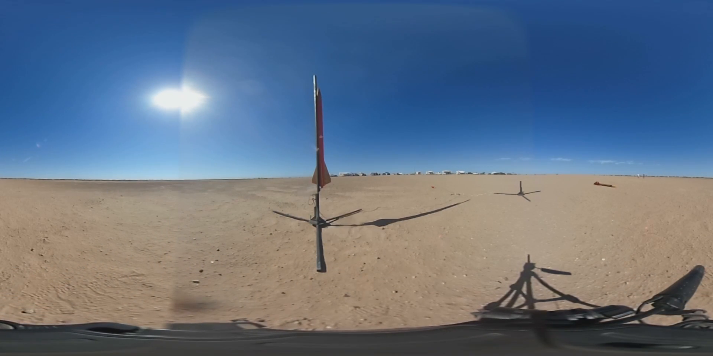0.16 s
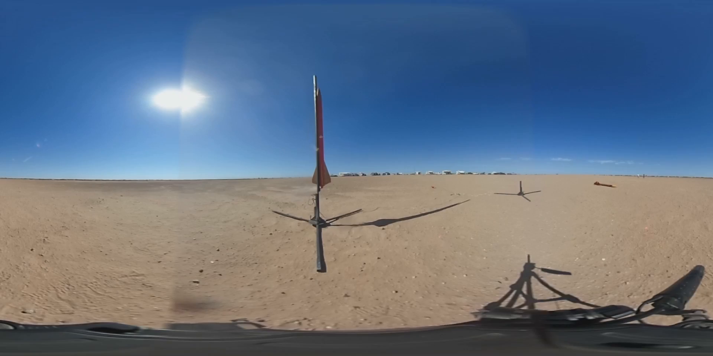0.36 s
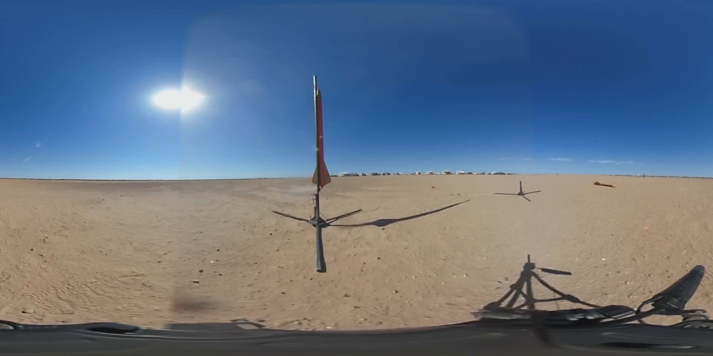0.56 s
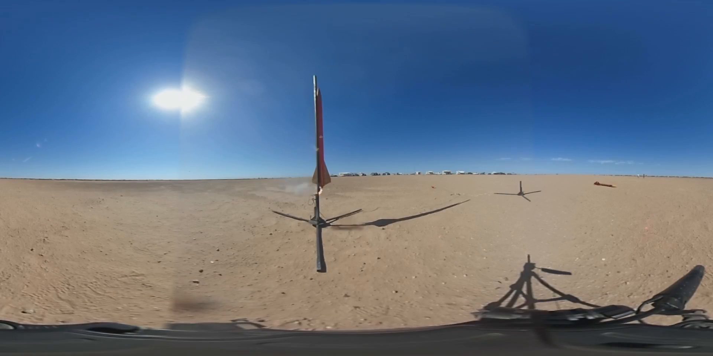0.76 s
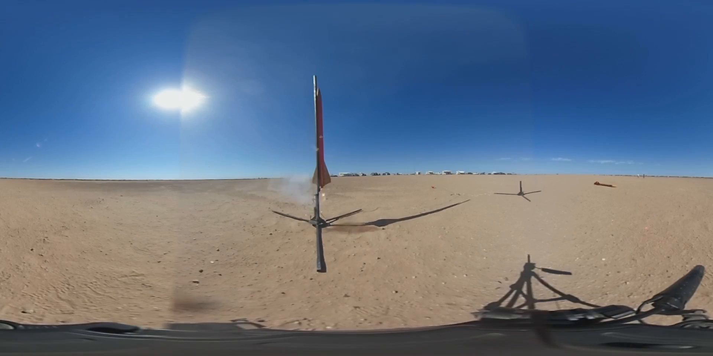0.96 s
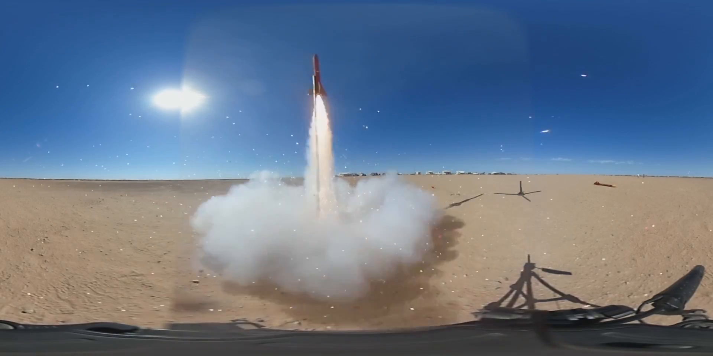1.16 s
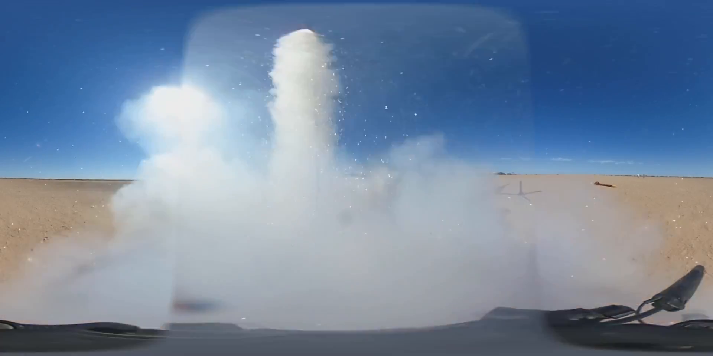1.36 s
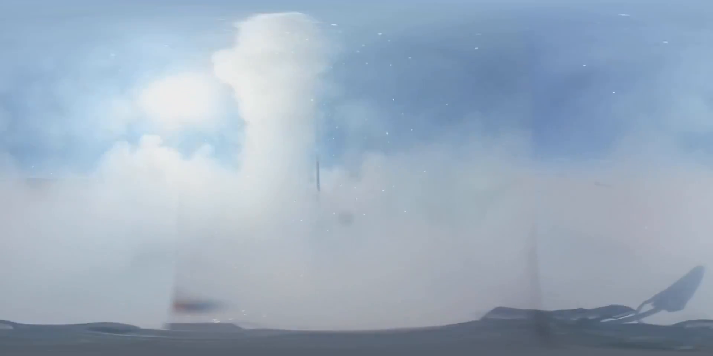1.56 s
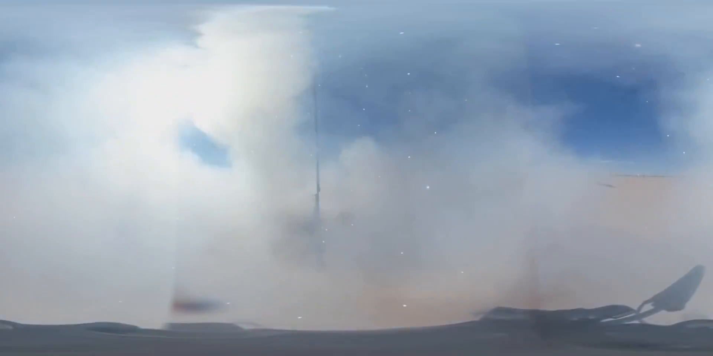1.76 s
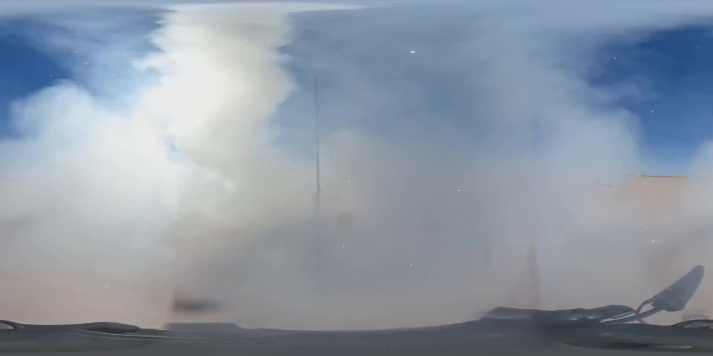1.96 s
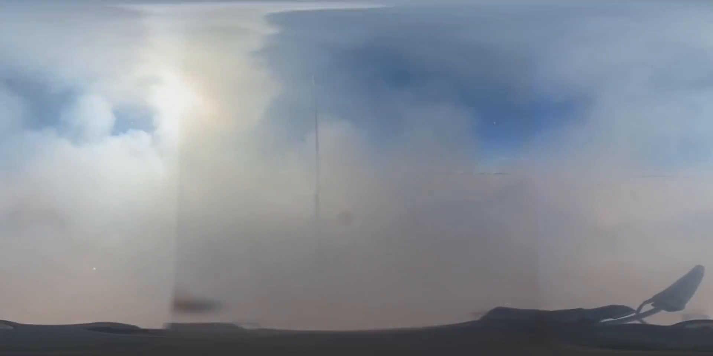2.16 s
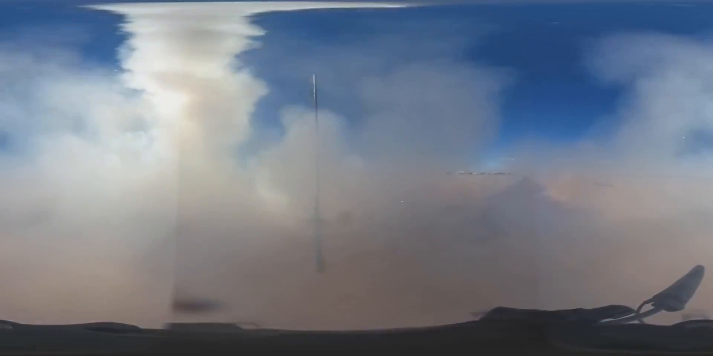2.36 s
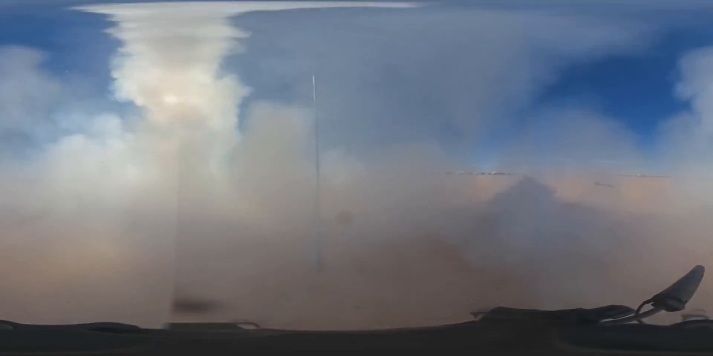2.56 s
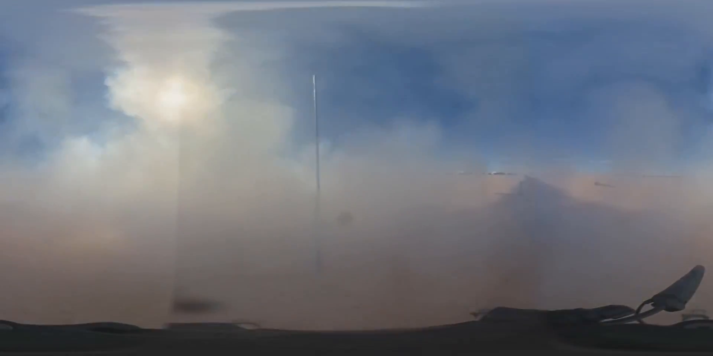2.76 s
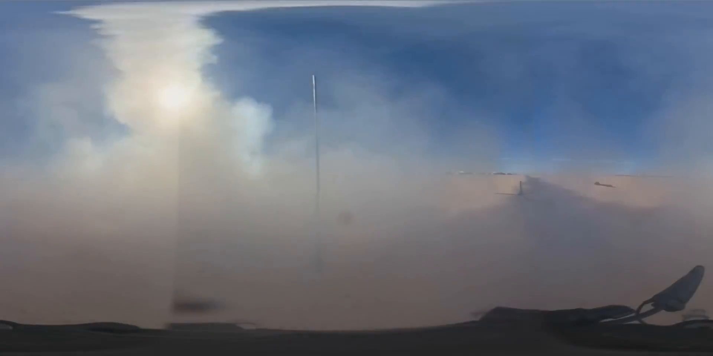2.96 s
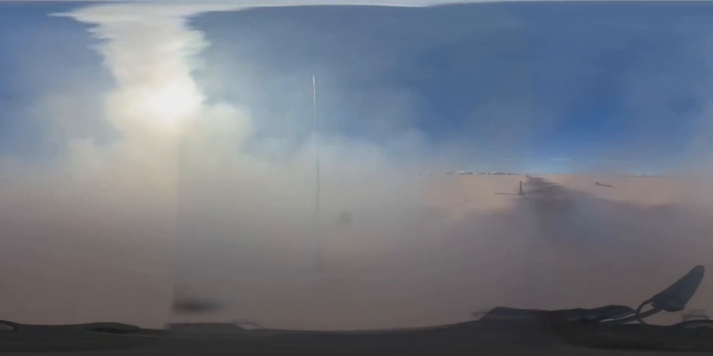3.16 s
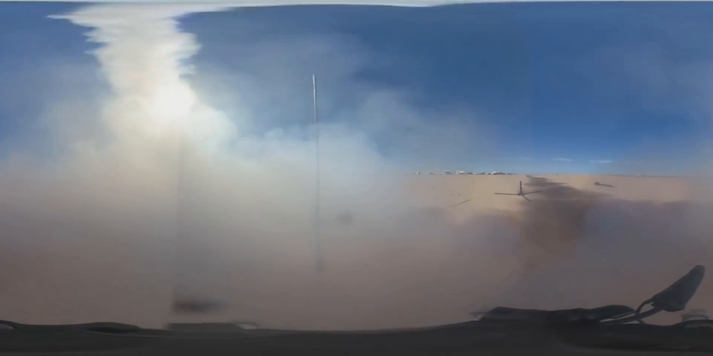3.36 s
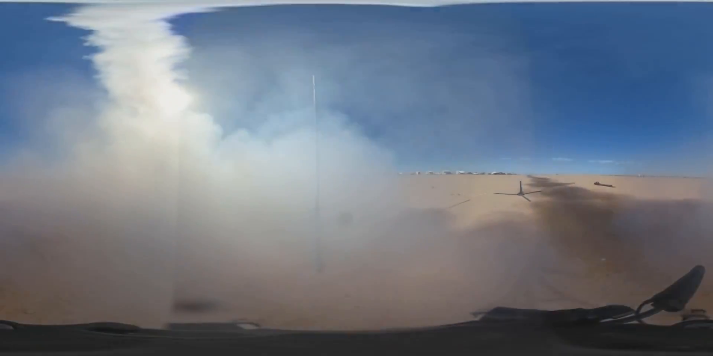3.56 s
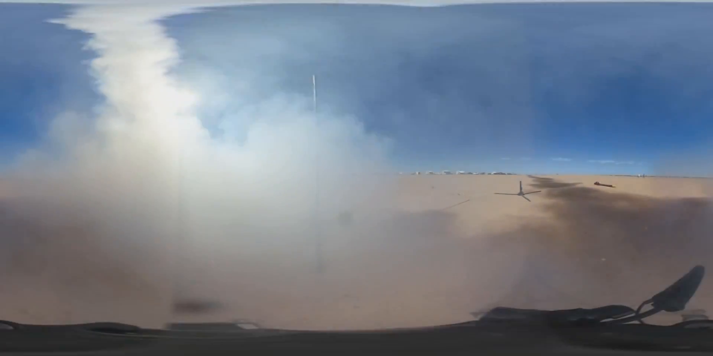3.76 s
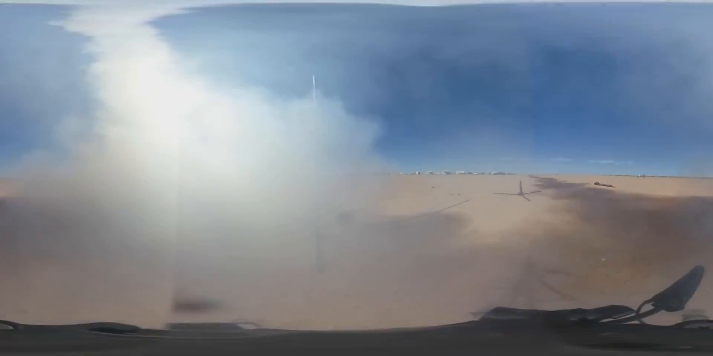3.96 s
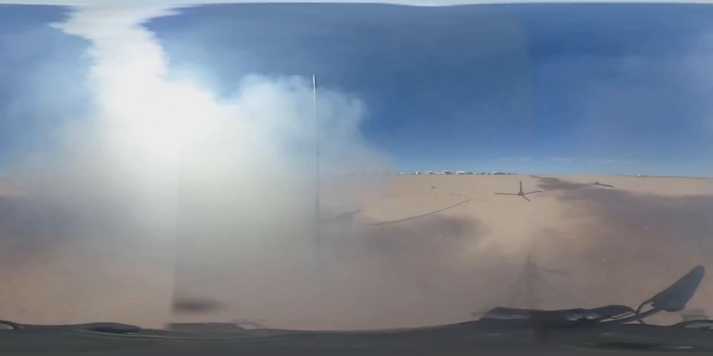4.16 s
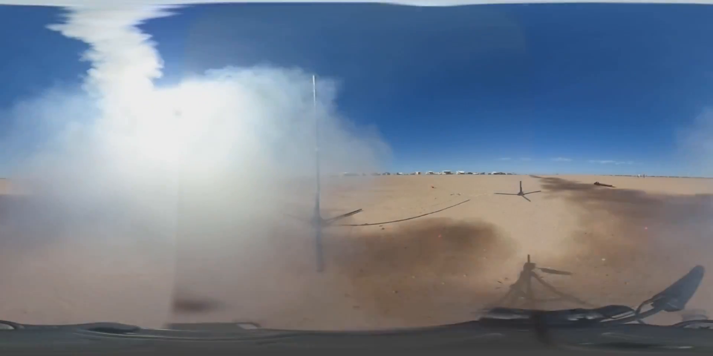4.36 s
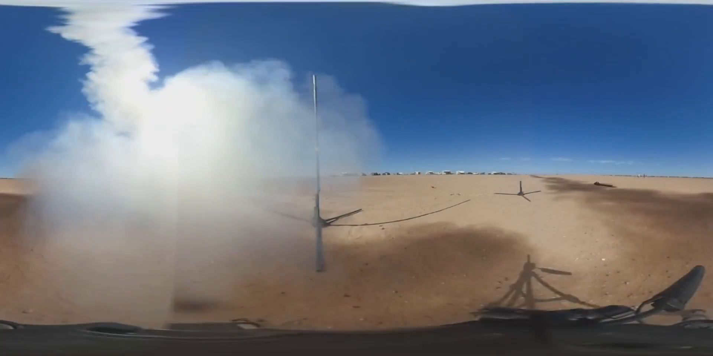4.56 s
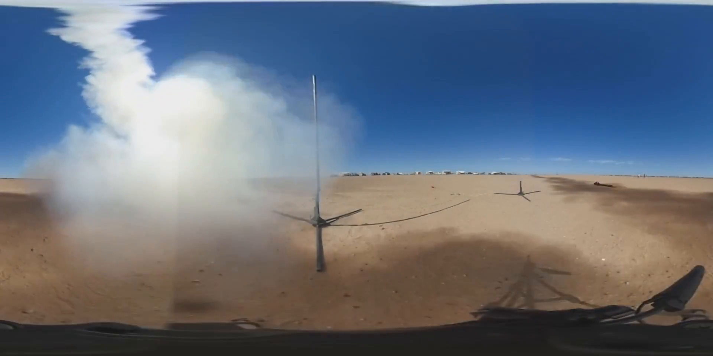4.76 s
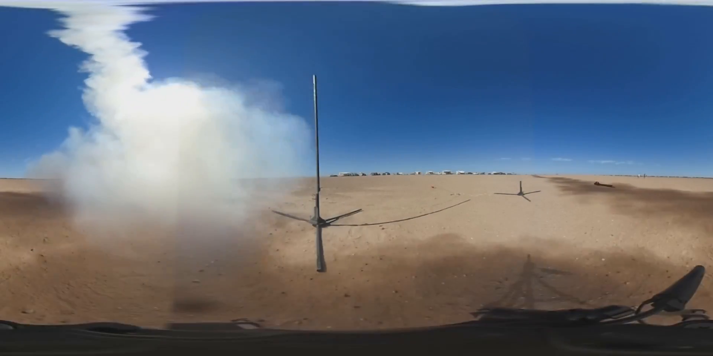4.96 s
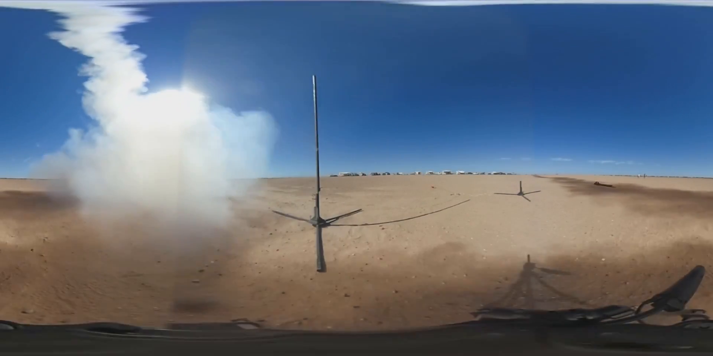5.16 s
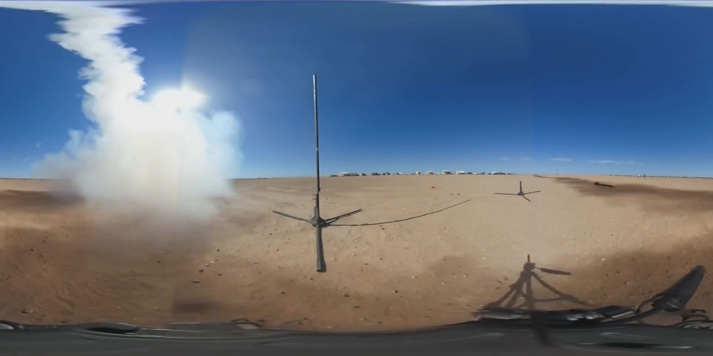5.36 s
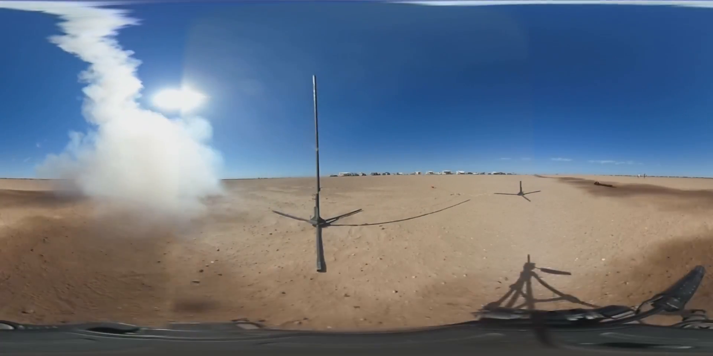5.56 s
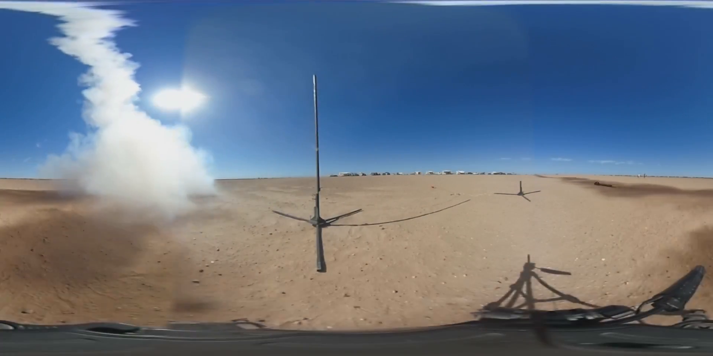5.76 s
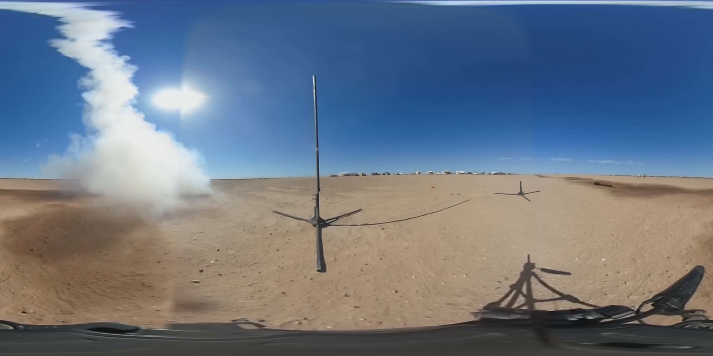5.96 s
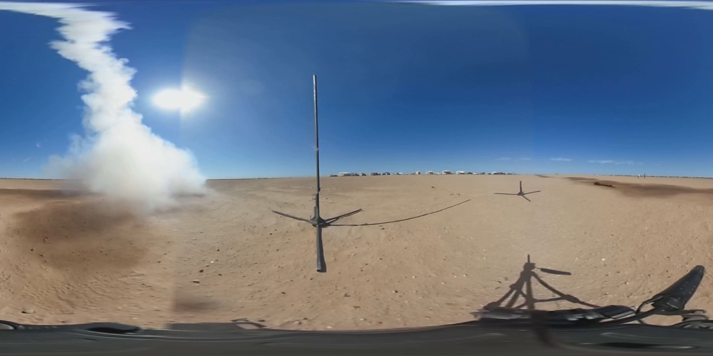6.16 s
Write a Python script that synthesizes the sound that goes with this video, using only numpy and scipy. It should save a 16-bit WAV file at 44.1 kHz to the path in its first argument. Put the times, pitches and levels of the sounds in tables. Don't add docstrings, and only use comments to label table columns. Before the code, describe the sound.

Open desert, small microphone a few metres from the pad. A very faint igniter hiss with a thin whistle, then a chuff, crackling pops and an abrupt harsh roar that overloads the microphone. It turns duller and bassier as the rocket climbs, with heavy low thuds, then fades. Grit ticks on the housing and the smoke cloud buffets the microphone before near silence returns.

```python
import sys
import numpy as np
from scipy import signal
from scipy.fft import rfft, irfft
from scipy.io import wavfile
from scipy.ndimage import uniform_filter1d

SR = 44100
rng = np.random.default_rng(int(sys.argv[2]) if len(sys.argv) > 2 else 0)


def volts_from_decibels(level):
    exponent = np.asarray(level, float) / 20
    return 10 ** exponent


def inscribe(sig):
    pcm = np.round(np.clip(np.atleast_2d(sig).T, -1, 1) * 32767)
    wavfile.write(sys.argv[1], SR, pcm.astype(np.int16))


N = 274478
T = np.arange(N) / SR
HZ = np.fft.rfftfreq(N, 1 / SR)


def curve(table):
    s, *columns = np.transpose(table)
    return [np.interp(T, s, column) for column in columns]


def noise(colour, shape=1):
    hz, db = np.transpose(colour)
    gain = volts_from_decibels(np.interp(np.log(HZ + 1), np.log(hz), db))
    x = irfft(rfft(rng.standard_normal(N)) * gain * shape, N)
    return x / np.std(x)


def walk(rate):
    k = int(SR / rate)
    steps = np.repeat(rng.standard_normal(N // k + 1), k)
    return 1.1 * uniform_filter1d(uniform_filter1d(steps, k), k)[:N]


def add(out, s, x):
    i = int(s * SR)
    out[i:i + len(x)] += x[:N - i]


def bump(s, width_s, db):
    return db * np.exp(-((T - s) / width_s) ** 2)


def peaks(base_db, rows, rise_db_s, fall_db_s):
    for s, db in rows:
        slope_db = np.where(T < s, rise_db_s * (s - T), fall_db_s * (T - s))
        base_db = np.maximum(base_db, db - slope_db)
    return base_db


def sand(x, lag_ms, share, size):
    late = np.interp(np.arange(N) - lag_ms * SR / 1000, np.arange(N), x)
    return (x + share * uniform_filter1d(late, size=size)) / np.sqrt(1 + share ** 2)


# (frequency [Hz], level [dB per Hz])
STILL_COLOUR = [(100, -1), (200, -2), (330, -5.5), (570, -7), (900, -10.5), (1300, -18), (2000, -21.5),
                (2800, -23.5), (6000, -26.5), (12000, -29)]
# (frequency [Hz], level [dB])
WHINES = [
    (1394, -84),
    (1857, -90.5),
]
WHINE_END_S = 5.992


def still():
    clock = T + 4.5 * np.clip(T - WHINE_END_S + .014, 0, None) ** 2
    whine = sum(np.sqrt(2) * volts_from_decibels(db) * np.sin(2 * np.pi * hz * clock) for hz, db in WHINES)
    fade_db = np.interp(T, [.6, 4.3, 5.8, 6.05], [-0.5, 0.5, 0, -4.0])
    colour = rfft(noise(STILL_COLOUR, HZ > 120))
    edges_hz = (0, 280, 450, 750, 1200)
    air = np.zeros(N)
    for lo, hi in zip(edges_hz, edges_hz[1:]):
        air += irfft(colour * (HZ >= lo) * (HZ < hi), N) * volts_from_decibels(2.2 * walk(12))
    hiss = irfft(colour * (HZ >= edges_hz[-1]), N)
    return (air * volts_from_decibels(fade_db) + hiss) * volts_from_decibels(-73) + whine * (T < WHINE_END_S)


# (time [s], level [dB])
WIND_LEVEL = [(0, -72.5), (.69, -74.5), (.72, -53), (.85, -65), (.96, -45), (1.034, -34), (1.17, -39.5),
              (1.3, -32), (1.8, -34), (2.0, -55.5), (2.66, -56), (4.36, -55.5), (4.65, -70.5),
              (6.22, -72.5)]
# (time [s], peak level [dB])
GUST_PEAKS = [
    (2.98, -46.5),
    (3.49, -51),
    (3.89, -47),
    (4.11, -47),
    (4.68, -65.5),
    (5.21, -67.5),
    (5.6, -67.5),
    (6.08, -67),
]
# (time [s], peak level [dB])
BUFFET_HITS = [(2.929, -24.5), (3.301, -35), (3.43, -36), (3.5, -41), (3.599, -43.5), (3.654, -45),
               (3.735, -37), (3.778, -47), (3.841, -34), (3.879, -41.5), (3.929, -38.5), (3.981, -44),
               (4.029, -38.5), (4.092, -31.5), (4.16, -38.5), (4.239, -56), (4.306, -54), (4.356, -54),
               (4.42, -51), (4.491, -56.5), (4.669, -59.5)]
BUFFET_DECAY_S = 0.1


def wind():
    level_db = peaks(curve(WIND_LEVEL)[0], GUST_PEAKS, rise_db_s=55.5, fall_db_s=64)
    eddies = walk(6.7)
    deep = noise([(14, -30), (30, -2), (60, -1), (100, -5.0), (150, -26.0), (400, -80)])
    deep *= volts_from_decibels(1.0 * eddies - 0.5)
    flutter = noise([(30, -33.5), (80, 0), (160, -1.5), (300, -21), (600, -35.5), (1500, -71.0)])
    flutter_db = -13.5 + 5.5 * np.clip(eddies, -1.5, 1.5)
    blow, slaps, t = np.zeros(N), np.zeros(N), T[:SR // 2]
    blow_shape = np.exp(-t * 3.25 / BUFFET_DECAY_S) * np.clip(t / 0.0035, 0, 1)
    slap = np.sin(2 * np.pi * 105 * t) + 0.33 * np.sin(2 * np.pi * 270 * t)
    slap *= np.exp(-t / 0.012) * np.clip(t / 0.0049, 0, 1)
    for s, db in BUFFET_HITS:
        add(blow, s, volts_from_decibels(db - 10.5) * blow_shape)
        add(slaps, s, volts_from_decibels(db - 4.0) * slap)
    blow *= volts_from_decibels(1.6 * walk(51))
    return volts_from_decibels(level_db) * (deep + volts_from_decibels(flutter_db) * flutter) + blow * flutter + slaps


# (time [s], level [dB])
FIZZ_LEVEL = [
    (0, -78.5),
    (.3, -75.5),
    (.6, -73.5),
    (.7, -63),
    (1.2, -69),
    (3.2, -77),
    (3.7, -84.5),
    (4.2, -87.5),
    (6.3, -112),
]
# (frequency [Hz], level [dB per Hz])
GAS_COLOUR = [(180, -43.5), (300, -13.5), (1400, 1), (1610, -8.5), (2300, -3.5), (3180, -22), (6470, -21),
              (7790, -12), (8950, -14), (12000, -8.5), (15600, -41), (22000, -120)]
IGNITER_OUT_S = 1.1


def fizz():
    level_db, = curve(FIZZ_LEVEL)
    whistle_db = -14.5 + bump(0.54, width_s=0.16, db=8.8)
    whistle_db -= 26 * np.clip((T - IGNITER_OUT_S) / .2 + .5, 0, 1)
    whistle = noise([(7300, -27), (7930, -0.5), (8500, -31.5)])
    spit = noise(GAS_COLOUR) + volts_from_decibels(whistle_db) * whistle
    return sand(spit, lag_ms=1.37, share=0.48, size=2) * volts_from_decibels(level_db + 1.5 * walk(11))


# (time [s], level [dB], sharpness of the flame [dB])
ON_PAD = [
    (.7, -45, -34),
    (.712, -53, -28),
    (.728, -48, -26),
    (.914, -33.5, -19.5),
    (.982, -31, -14.5),
    (1.0, -23, -24),
    (1.016, -25, -28),
]
# (time [s], level [dB], sharpness [dB])
CLIMBING = [
    (1.032, -24, 8),
    (1.1, -18, 3),
    (1.26, -16.5, 0),
    (1.376, -7.5, -9.5),
    (1.634, -15.5, -24.5),
    (1.86, -22.5, -23),
    (2.15, -31.5, -27.5),
    (2.56, -33.5, -31),
    (2.9, -42, -30),
]
# (time [s], level [dB], sharpness [dB])
BURNING_OUT = [
    (3.12, -45, -28),
    (3.28, -56.5, -22.5),
    (3.62, -71, -9.5),
    (4.0, -80, -2),
    (4.5, -78.5, -15),
]
# (frequency [Hz], level [dB per Hz])
PLUME_COLOUR = [(20, -35), (50, -18.5), (130, -2), (270, 3.5), (500, -4), (1000, -8.5), (2000, -16),
                (2700, -19.5), (3300, -30), (4300, -34), (6000, -40), (8500, -43), (12000, -45.5)]
# (frequency [Hz], width [Hz], gain [dB])
PORT_RINGS = [(7850, 870, 4.5), (11800, 2700, 10)]


def jet():
    level_db, sharp_db = curve(ON_PAD + CLIMBING + BURNING_OUT)
    level_db += bump(1.77, width_s=.02, db=-3)
    shadow_db = bump(1.155, width_s=0.046, db=-16)
    roar_db, hiss_db = level_db + shadow_db, level_db + sharp_db
    rumble_db = roar_db - 2.5 + np.interp(T, (1.4, 1.45), [-3.5, 0])
    rumble_db += bump(1.67, width_s=0.063, db=8)
    rumble_db -= 2 * np.clip(T - 2, 0, None)
    rush_db = level_db - 9 + 0.45 * np.clip(sharp_db + 19, 0, None) + 0.56 * shadow_db
    rush_db += -5.5 * (T < CLIMBING[0][0])
    rush_db += bump(3.58, width_s=.12, db=5)
    low, mid, high = (1 / (1 + (HZ / hz) ** 6) for hz in (330, 1100, 4200))
    port = volts_from_decibels(sum(db / (1 + (2 * (HZ - hz) / width) ** 2) for hz, width, db in PORT_RINGS))
    lumps, crackle = walk(25), walk(150)
    rumble = noise(PLUME_COLOUR, low) * volts_from_decibels(rumble_db + 1.0 + 1.6 * lumps)
    roar = noise(PLUME_COLOUR, mid - low) * volts_from_decibels(roar_db + 1.5 * lumps + 1.29 * crackle)
    rush = noise(PLUME_COLOUR, high - mid) * volts_from_decibels(rush_db + 0.24 * lumps + 1.4 * crackle)
    hiss = noise(PLUME_COLOUR, (1 - high) * port) * volts_from_decibels(hiss_db + 1.2 * walk(14) + 1.5 * walk(90))
    burning = np.clip((T - .694) / 0.005, 0, 1) * np.clip((4.7 - T) / 0.39, 0, 1)
    return (rumble + roar + rush + hiss) * burning


# (time [s], peak level [dB], length [ms])
SURGES = [(0.695, -36, 8.5), (0.742, -37, 2), (.869, -21.5, 1.94), (.92, -18.5, 2.8), (0.935, -22, 1.07),
          (0.987, -22, 2.2), (1.005, -16.5, 1.05), (1.017, -18.5, 7.3), (1.862, -57, 5.2), (1.884, -7.5, 3),
          (1.908, 5.5, 5.5), (1.945, -15, 4.9), (1.981, -15, 3.8), (2.042, -10.5, 6.4), (2.056, -7, 3.5),
          (2.092, -7.5, 5.1), (2.13, -17, 2.85), (2.159, -18.5, 5.2), (2.174, -13.5, 4), (2.242, -2, 5.93),
          (2.275, -12.5, 3.7), (2.328, -15, 2.84), (2.45, -15.5, 4.15), (2.568, -17, 9.6),
          (2.575, -13.5, 2.85)]


def thuds():
    out = np.zeros(N)
    for s, db, ms in SURGES:
        length = ms * SR / 1000
        u = np.arange(int(1.3 * length)) / length
        add(out, s, volts_from_decibels(db) * np.sin(2 * np.pi * u) * np.hanning(len(u)) ** 0.35)
    return uniform_filter1d(uniform_filter1d(out, size=4), size=6)


LIFT_S, LIFT_M_S2, LEAN_MS_PER_S = 1.01, 64, 0.14
NOZZLE_M, PAD_M, CAMERA_M = 1.07, 3.0, .73


def bounce():
    flight = np.clip(T - LIFT_S, 0, None)
    height = NOZZLE_M + .5 * LIFT_M_S2 * flight ** 2
    extra_m = np.hypot(PAD_M, height + CAMERA_M) - np.hypot(PAD_M, height - CAMERA_M)
    share = np.interp(T, (0.969, 1.029, 1.2, 1.31), [.85, 0.061, 0.061, .72])
    return extra_m / .343 + LEAN_MS_PER_S * flight, share


# (time [s], peak level [dB], level of the lower ring [dB])
GRAINS = [(1.9463, -51, -19), (1.9872, -39, -9), (2.0174, -38, -21), (2.0596, -38, -6), (2.1209, -39, -14),
          (2.246, -43, -16), (2.2741, -58, -9), (2.3055, -44, -20), (2.4677, -48, -12), (2.581, -53, -18),
          (2.6123, -52, -15), (2.63, -41.5, -24), (2.7161, -60, -25), (2.731, -55, -21), (2.787, -48, -23),
          (2.873, -61, -15), (2.9063, -54.5, -3), (2.9437, -57, -23), (3.0313, -48, -15.5),
          (3.7463, -55, -19), (3.9094, -54, -20)]
# (time [s], peak level [dB])
DUST_PUFFS = [(1.9, -66), (2.03, -59), (2.07, -56), (2.3, -73), (2.47, -75), (2.63, -66), (2.82, -72),
              (3.04, -59.5), (3.459, -77.5), (3.55, -76), (3.76, -77.5), (3.87, -71), (3.92, -76)]
GRIT_DECAY_S = .0016


def grit():
    out, t = np.zeros(N), T[:1500]
    upper = noise([(3500, -27), (6000, -17.5), (10000, -23.5), (11600, 6.5), (12000, -12.5)])
    lower = noise([(6500, -12), (8100, -11), (9700, -31)])
    for s, db, low_db in GRAINS:
        i = int(s * SR)
        spray = upper[i:i + len(t)] + volts_from_decibels(low_db + 12.0) * lower[i:i + len(t)]
        add(out, s, volts_from_decibels(db - 7) * spray * np.exp(-t / GRIT_DECAY_S))
    blowing = np.clip((T - 1.8) / .1, 0, 1) * np.clip((4.4 - T) / .1, 0, 1)
    sinking_db = -70 - 12 * (T - 2)
    dust_db = peaks(sinking_db, DUST_PUFFS, rise_db_s=344, fall_db_s=200)
    return out + upper[::-1] * volts_from_decibels(dust_db - 6.5 + 2.7 * walk(160)) * blowing


def scene():
    rocket = sand(jet() + thuds(), *bounce(), size=6)
    return (still() + wind() + fizz() + rocket + grit())[None]


def band_limit(x):
    return signal.sosfilt(signal.butter(12, 15710, fs=SR, output="sos"), x)


CEILING = .2
EDGE_HZ, TOP_HZ = 12000, 16300


def record(dry):
    below = np.clip((EDGE_HZ - HZ) / 60, 0, 1)
    above = (1 - below) * np.clip((TOP_HZ - HZ) / 3500, 0, 1) ** 1.1
    heard = irfft(rfft(dry) * below, N)
    clipped = heard / (1 + np.abs(heard / CEILING) ** 16) ** (1 / 16)
    over = 1. * (np.abs(heard) > CEILING)
    busy = np.sqrt(uniform_filter1d(np.diff(clipped, prepend=0) ** 2, size=1024))
    overload = uniform_filter1d(over, size=3000)
    grain = rfft(volts_from_decibels(-6.5) * rng.standard_normal(dry.shape) * busy * overload ** 1.3)
    fine = volts_from_decibels(-7.5) * rng.standard_normal(dry.shape) * busy ** 1.2
    fine *= np.clip((overload - .05) / .2, 0, 1)
    reach_hz = 14950 + 45 * 20 * np.log10(busy / CEILING + 1e-9) + 260 * np.round(walk(22))
    edges_hz = np.arange(13600, 15900, 250)
    spill = rfft(fine) * np.clip((edges_hz[0] - HZ) / 250, 0, 1) * (HZ > EDGE_HZ - 60)
    for hz in edges_hz:
        reached = fine * np.clip((reach_hz - hz) / 80, 0, 1)
        spill = spill + rfft(reached) * np.clip(1 - np.abs(HZ - hz) / 250, 0, 1)
    flat = uniform_filter1d(over, size=260)
    rattle = volts_from_decibels(-49) * noise([(2000, -25), (3500, 0), (6000, -4), (8000, -22)]) * flat
    spill += rfft(rattle) * (HZ < 11000)
    passed = rfft(clipped) * (below + volts_from_decibels(-50.5) * above)
    spilled = spill * np.where(HZ < EDGE_HZ - 60, 1, above)
    mix = irfft(passed + grain * below + spilled, N)
    return band_limit(mix)


dry = scene()
out = record(dry)
inscribe(out)
```